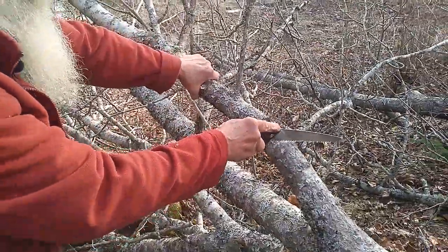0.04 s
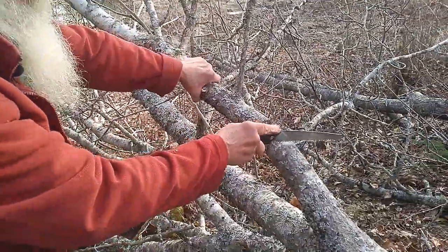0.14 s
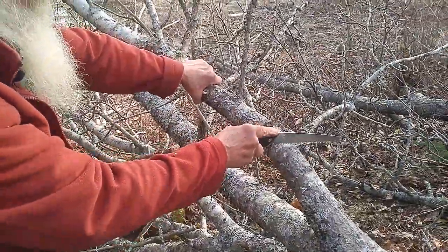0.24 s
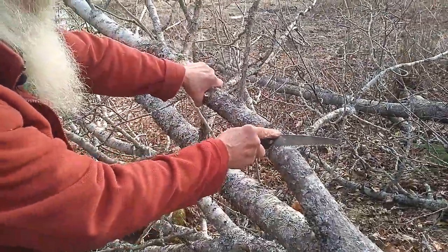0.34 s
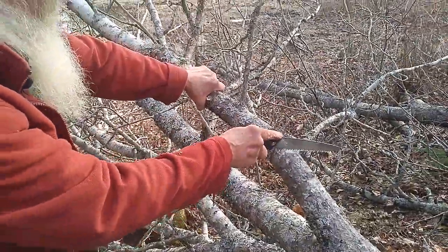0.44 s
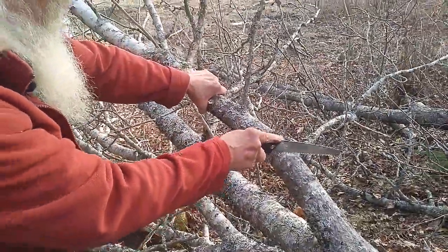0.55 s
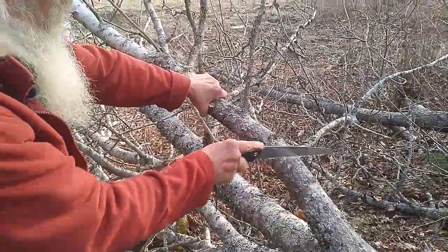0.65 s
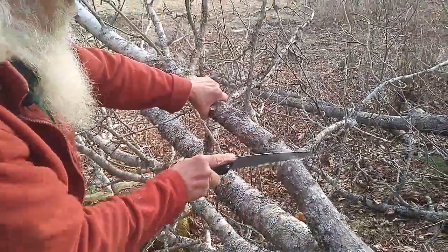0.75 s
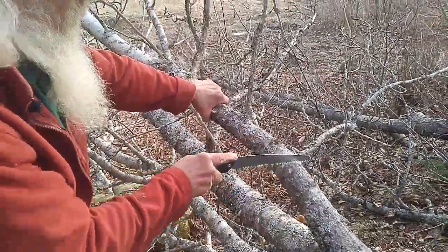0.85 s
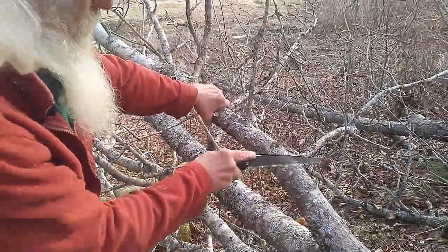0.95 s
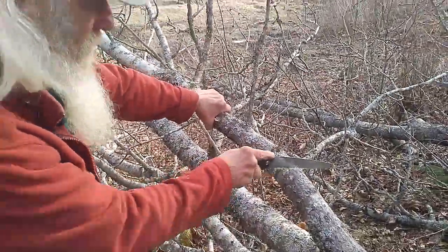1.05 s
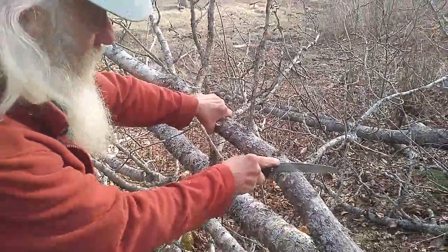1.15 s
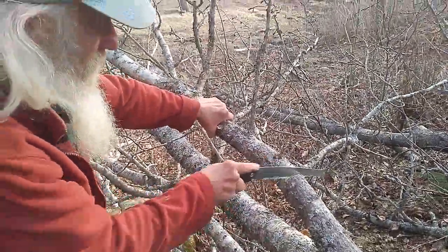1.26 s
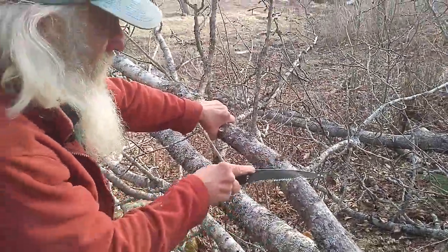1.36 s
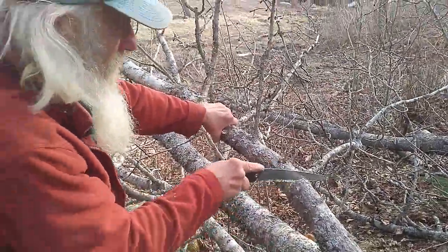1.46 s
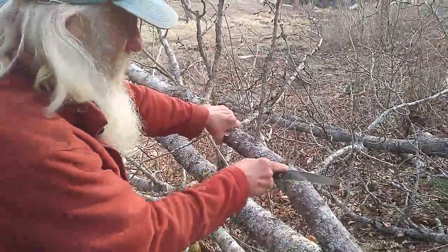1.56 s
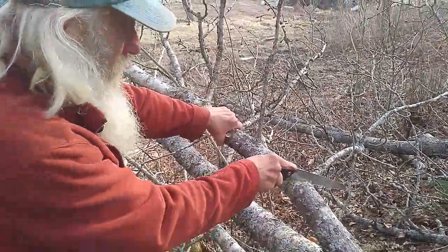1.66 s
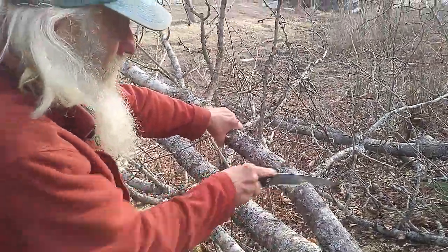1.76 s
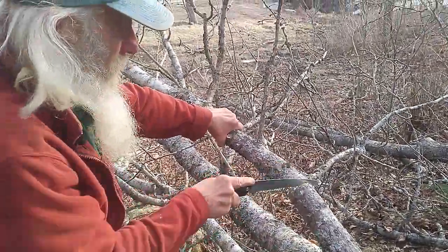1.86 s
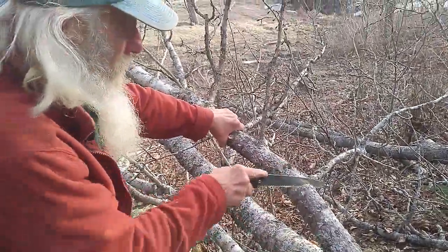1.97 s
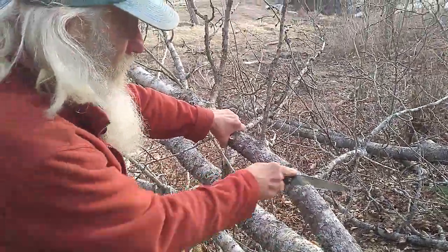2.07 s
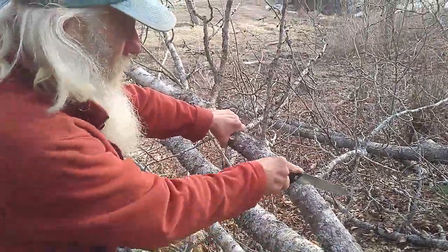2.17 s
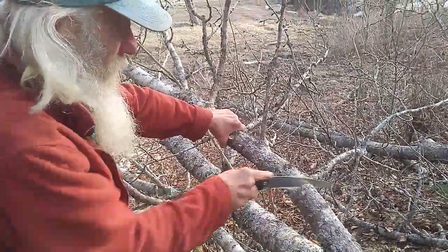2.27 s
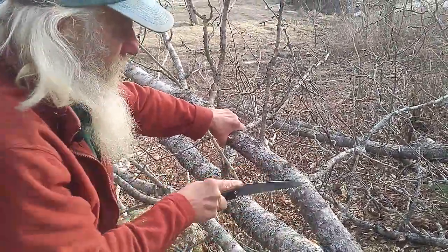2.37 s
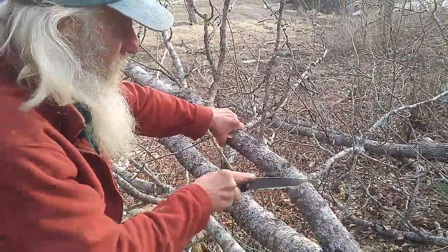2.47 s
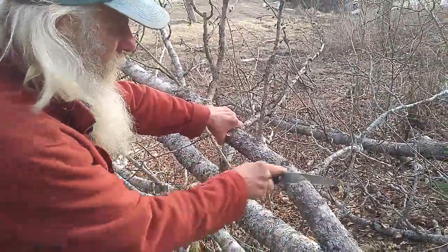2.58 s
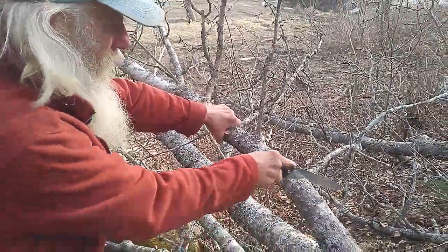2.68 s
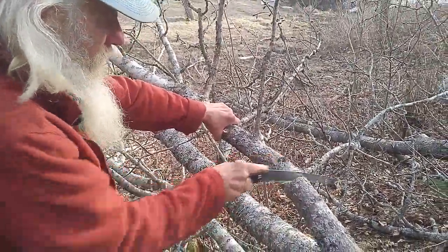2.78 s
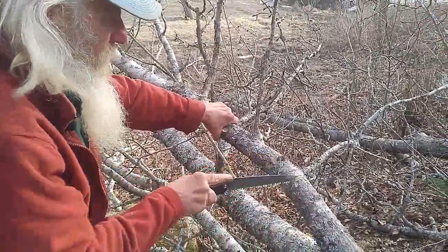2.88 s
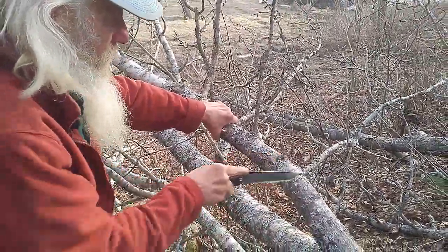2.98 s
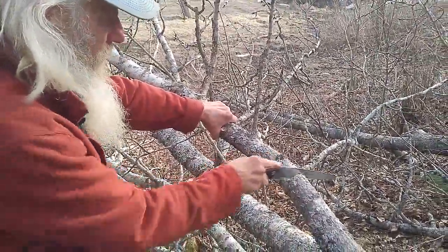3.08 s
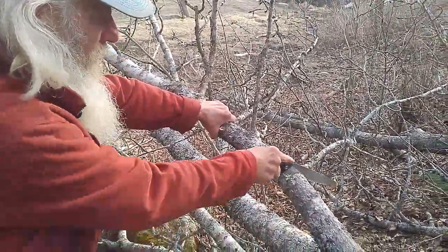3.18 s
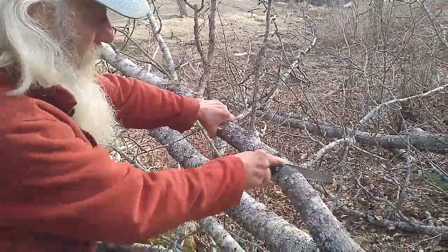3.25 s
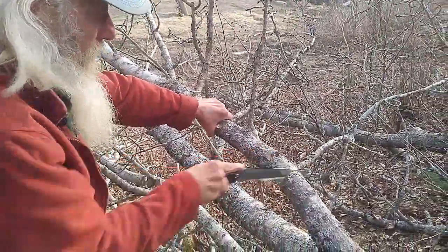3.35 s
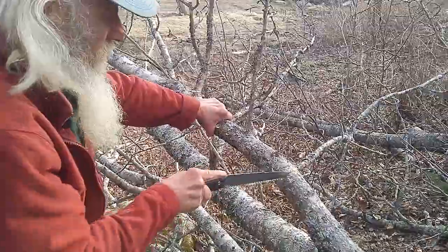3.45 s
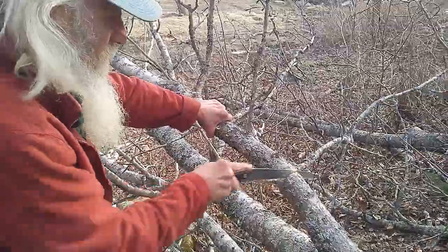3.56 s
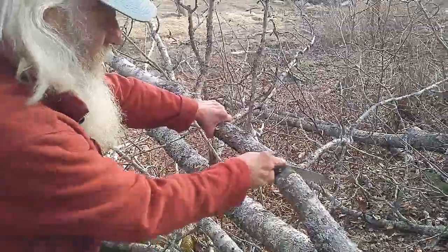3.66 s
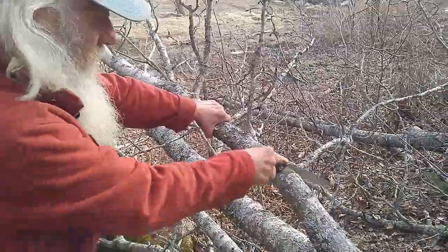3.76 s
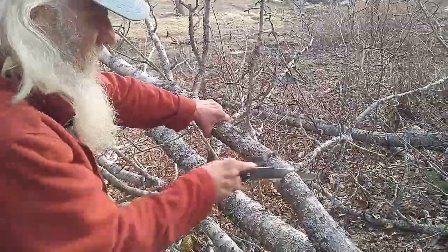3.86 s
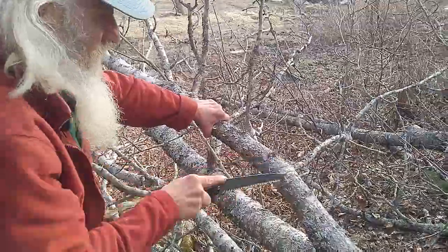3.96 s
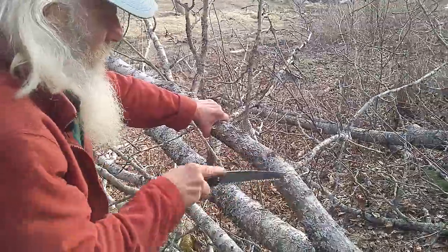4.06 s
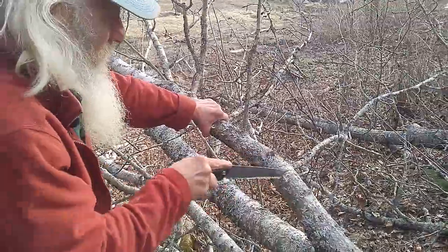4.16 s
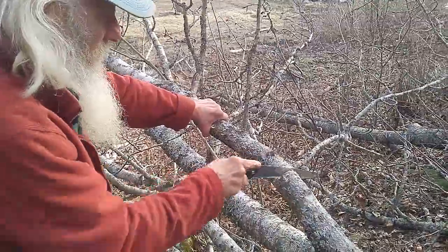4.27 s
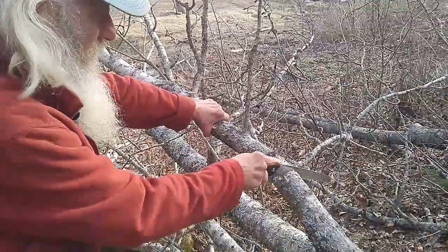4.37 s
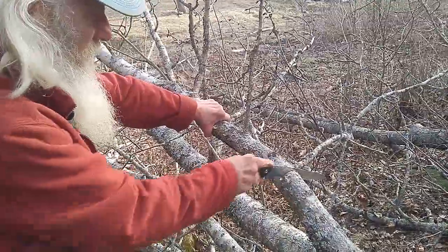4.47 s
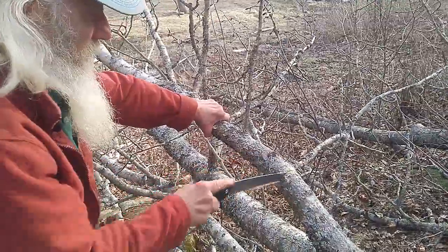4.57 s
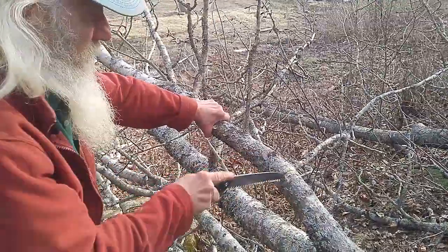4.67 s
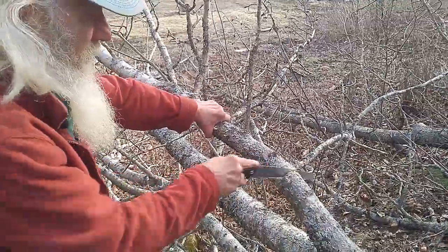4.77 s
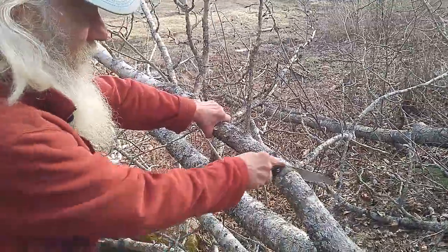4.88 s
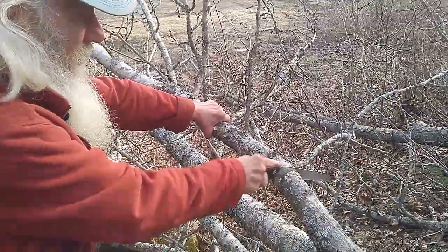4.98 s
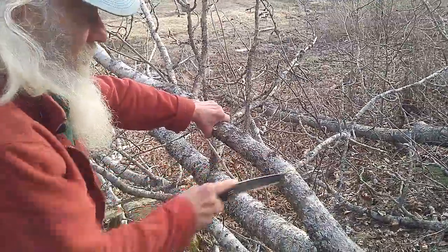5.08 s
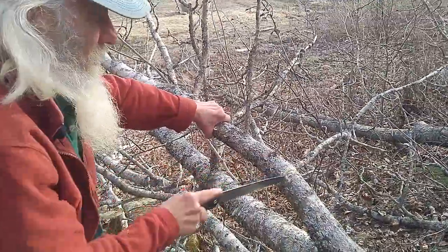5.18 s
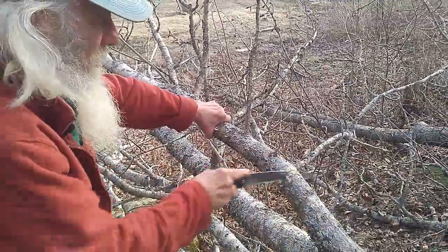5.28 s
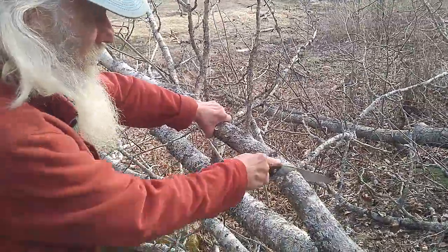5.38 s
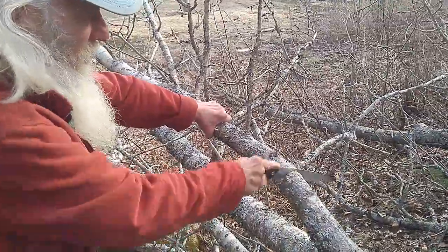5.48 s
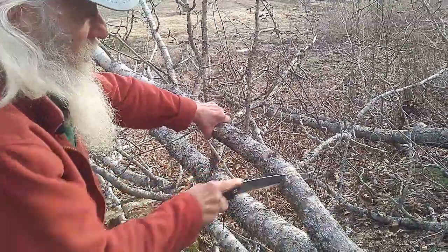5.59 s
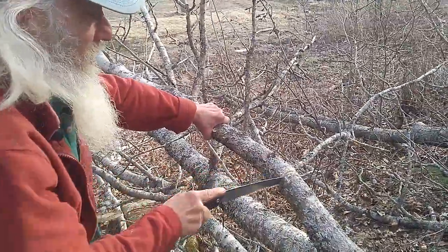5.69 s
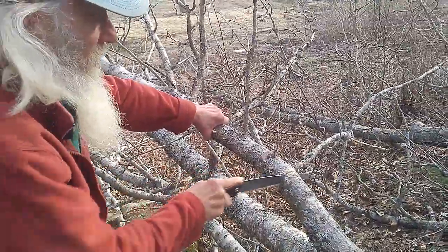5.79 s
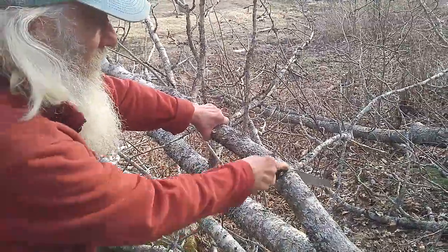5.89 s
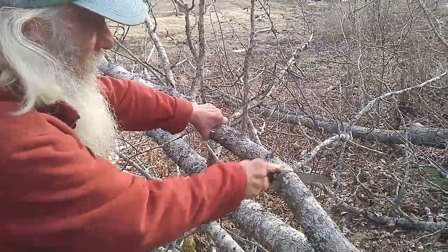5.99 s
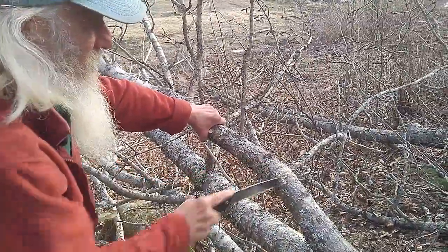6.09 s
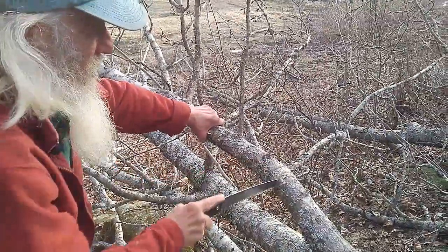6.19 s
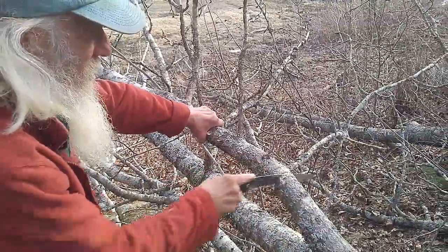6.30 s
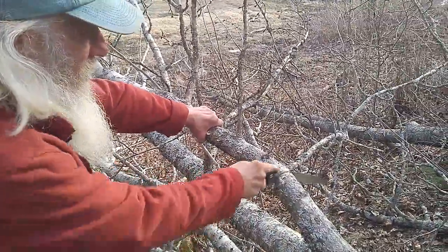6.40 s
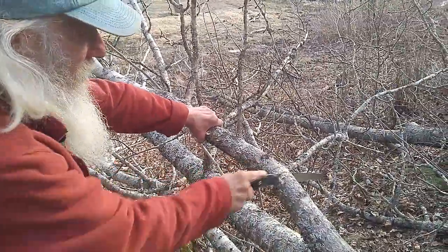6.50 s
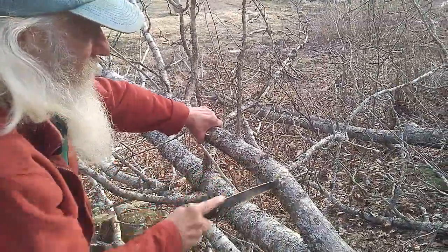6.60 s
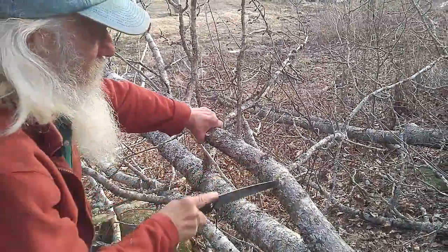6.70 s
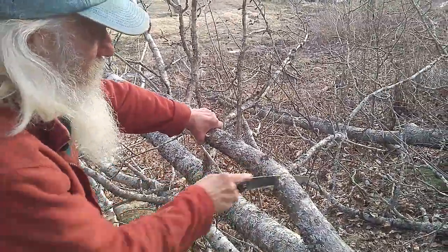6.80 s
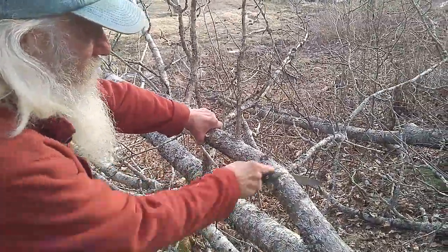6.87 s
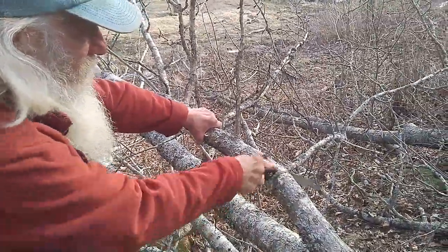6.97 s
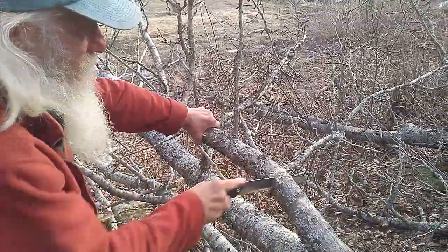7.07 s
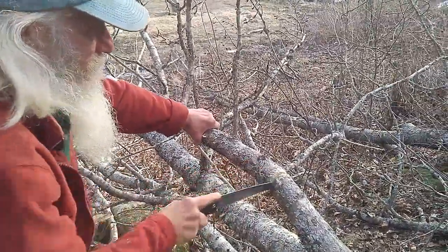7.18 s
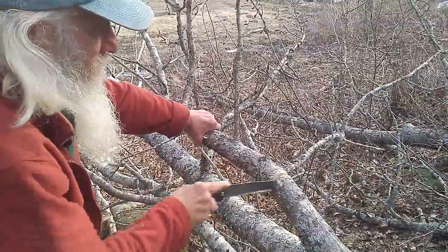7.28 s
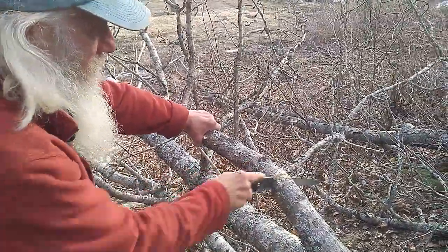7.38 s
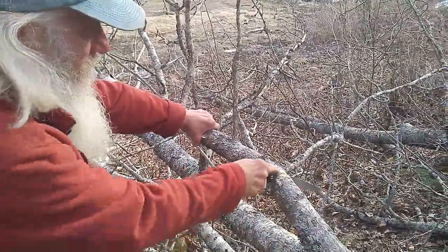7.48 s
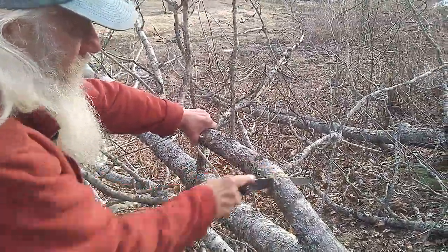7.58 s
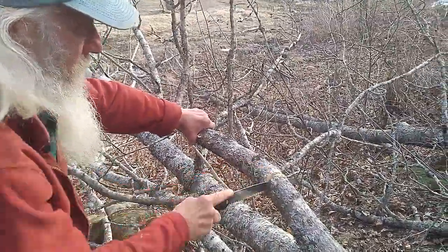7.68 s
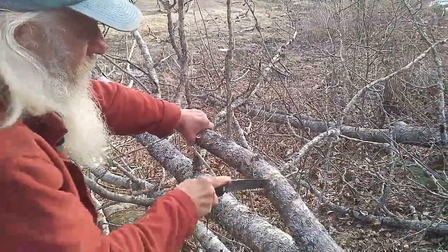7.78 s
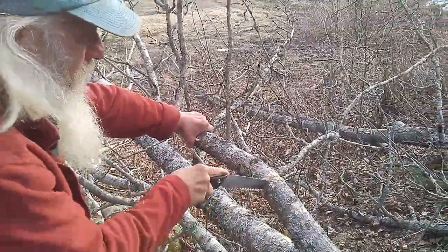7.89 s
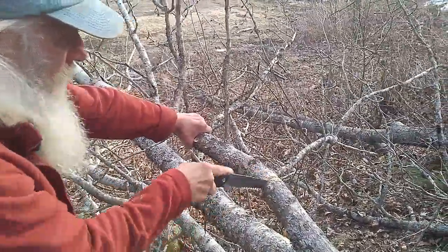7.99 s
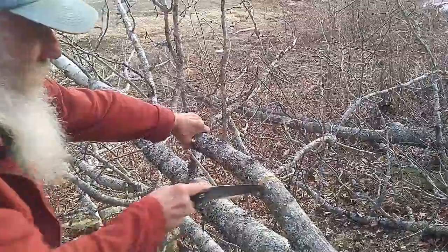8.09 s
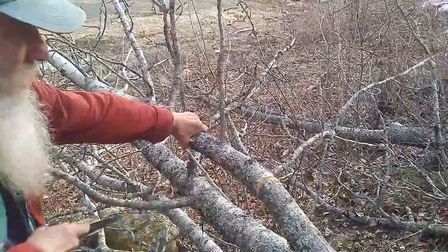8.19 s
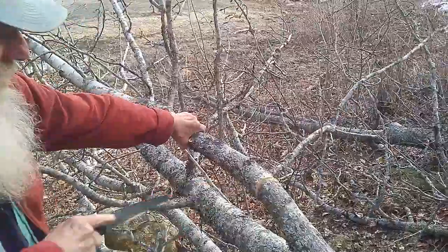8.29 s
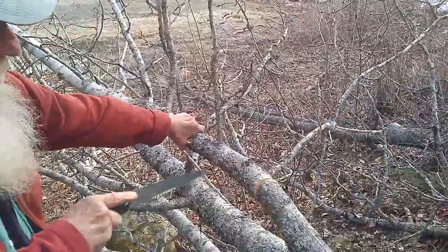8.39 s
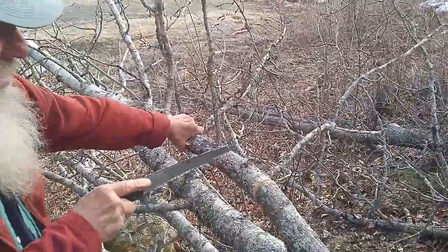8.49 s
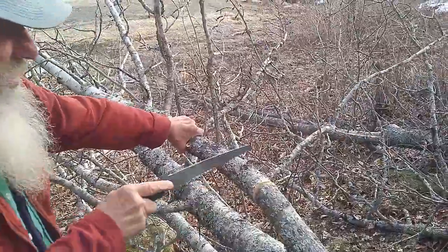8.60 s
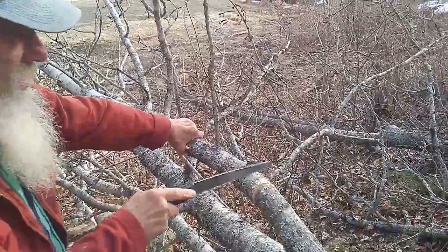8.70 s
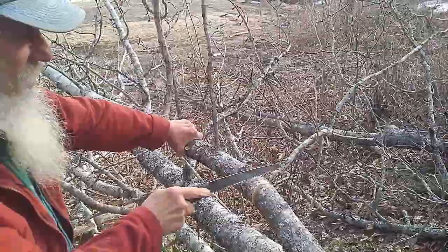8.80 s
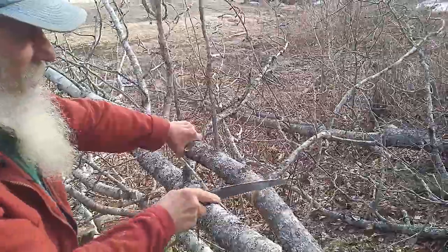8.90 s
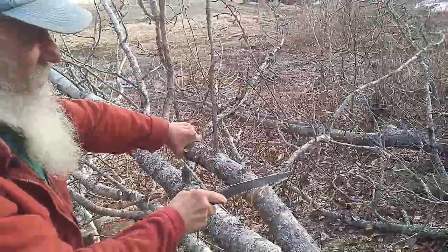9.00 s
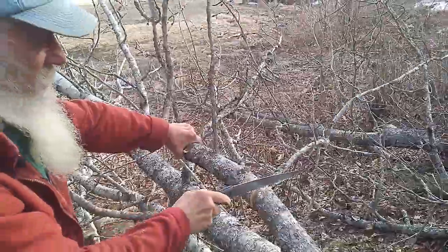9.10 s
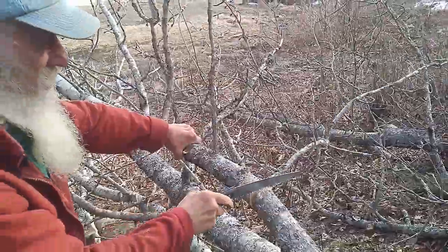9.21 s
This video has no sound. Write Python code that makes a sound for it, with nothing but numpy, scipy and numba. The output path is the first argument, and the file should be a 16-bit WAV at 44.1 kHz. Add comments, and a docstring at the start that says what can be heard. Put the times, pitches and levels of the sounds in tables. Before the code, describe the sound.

A quiet outdoor hush with faint dry rustling and tiny twig ticks opens the scene. At 0.7 s a hand saw starts on a branch, close and dry: a bright, gritty rasp with a buzzing knock of teeth. Loud pulls of about 0.2 s alternate with softer, duller pushes, nearly two pulls a second, growing stronger and more woody. Low shudders and jolts of the limb lie beneath. A sharp crack sounds at 4.0 s, a tiny thin bird chirp at 4.5, more snaps at 5.2 and 5.7, then clusters at 6.2-6.35, 6.7, 7.3 and, loudest, 7.8. The last push ends near 7.6; a short pull follows, and at 8.2 the blade scrapes out with heavy low thumps and a leafy swish. From 8.4 it calms: a brief brush and light cracks at 8.65, a very faint chirp near 8.95, small low knocks and ticks around 9.1.

```python
"""Leaves stir in a quiet wood; then a hand pruning saw works a branch in loud cutting pulls and lighter pushes,
until the blade is drawn out with a scrape. Teeth knock at a rate that follows stroke speed; torn grit throbs with
the teeth and rings blade and wood. Short noise bursts crack as fibres break and the branch snaps; filtered bass
noise shakes with load and jolts. Crackly grains rustle, tiny twigs tick, a small bird calls twice in gliding sines
over shaped-noise air."""
import sys
import numpy as np
from scipy import signal
from scipy.fft import rfft, irfft
from scipy.io import wavfile
from scipy.ndimage import uniform_filter1d
from numba import njit

SR = 44100
rng = np.random.default_rng(int(sys.argv[2]) if len(sys.argv) > 2 else 0)


def level_to_linear(level):
    """Convert decibel levels to linear amplitude factors, elementwise."""
    exponent = np.asarray(level, float) / 20
    return 10 ** exponent


def pcm_store(signal):
    """Save signal as 16-bit PCM."""
    levels = np.round(np.clip(np.atleast_2d(signal), -1, 1) * 32767)
    wavfile.write(sys.argv[1], SR, levels.astype(np.int16).T)


N = 407925
T = np.arange(N) / SR

# cutting pulls; the last row is the scrape of the blade drawn out:
# start t/s, end t/s, nominal top tooth rate f/Hz, nominal rasp level/dB, nominal knock level/dB
PULLS = [(.67, .9, 300.4, -44, -52), (1.267, 1.433, 245.4, -43.5, -53), (1.792, 1.966, 239.9, -42, -46.5),
         (2.275, 2.474, 279.5, -41, -45), (2.794, 2.993, 320.7, -41, -41.5),
         (3.312, 3.532, 300.6, -41, -45.5), (3.855, 4.077, 270, -40, -47.5),
         (4.538, 4.713, 323.4, -40, -53), (5.06, 5.246, 330.5, -39, -52.5),
         (5.575, 5.767, 265.4, -40.5, -49), (6.1, 6.286, 295.6, -39, -47), (6.597, 6.785, 247.5, -38, -55),
         (7.112, 7.325, 240.7, -37, -50), (7.653, 7.785, 284, -38.5, -57),
         (8.176, 8.258, 307, -37.5, -45.5)]
# light pushes back: start t/s, end t/s, nominal top tooth rate f/Hz, nominal rasp level/dB, nominal knock level/dB
PUSHES = [(.98, 1.23, 285, -54.5, -53.5), (1.525, 1.758, 255, -54, -68), (2.045, 2.22, 245, -49, -44.5),
          (2.54, 2.74, 250, -48, -50), (3.043, 3.255, 270, -49, -54.5), (3.59, 3.787, 310, -45.5, -52.5),
          (4.24, 4.48, 230, -48.5, -52.5), (4.807, 5.0, 285, -47, -57.5), (5.302, 5.529, 300, -45.5, -52.5),
          (5.833, 6.074, 310, -45.5, -51), (6.335, 6.537, 290, -45, -63), (6.86, 7.07, 148, -45, -42),
          (7.375, 7.591, 290, -46, -58)]
# shared by all strokes of a kind, by key: fastest (part of stroke), uneven (0-1), catch_s (teeth bite, t/s),
# rasp_db (early, late against middle in a shallow cut, level/dB), deep_db (added to these at depth 1, level/dB),
# grind_db (wood early, late, level/dB), dull_db (top end, level/dB), shake_db (bending of branch, level/dB),
# way (1 heel to tip, -1 back)
PULL_KIND = dict(fastest=.53, uneven=.23, catch_s=0.025, rasp_db=(-1, -1), deep_db=(-3, 2.5),
             grind_db=(-50.5, -46.5), dull_db=-1.4, shake_db=-54.5, way=1)
PUSH_KIND = dict(fastest=.42, uneven=0.0689, catch_s=0.016, rasp_db=(3.5, 0.5), deep_db=(-8.5, -7.5),
             grind_db=(-54, -51), dull_db=-5, shake_db=-75, way=-1)
# how tightly the cut grips the blade: t/s, grip (about 0-1)
DEPTH = [(.7, 0.25), (4.0, 1), (6.3, 1.01), (7.3, 0.5), (7.7, 0.4)]
# top end of the blade: t/s, relative level/dB
TOP_END = [(.7, -1), (2.7, -4), (4.0, -2.5), (4.8, -1), (6, 1), (7.2, -6.5), (7.7, -7), (8.2, -11)]
# partials of the tooth knock: multiple of tooth rate, relative level/dB
TOOTH_ORDERS = [(1, 0), (2, -8), (3, -15), (4, -18)]
# blade rings: nominal f/Hz, width f/Hz, relative level/dB, change from middle to tip level/dB (opposite to heel)
BLADE = [(1924, 130, -2.5, -4.5), (2200, 260, -7.5, -2), (3000, 680, -10.5, 2), (3410, 296, 0.5, 1),
         (4500, 1460, -6.5, -1.2), (5773, 310, 0, -2.2), (6400, 870, -4, -1.5), (7470, 1000, -7.5, -1.5),
         (9650, 3300, -6.5, -1), (11750, 2200, -1.5, 0.5), (14100, 2700, -11, 0)]
# wood resonances: nominal f/Hz, width f/Hz, relative level/dB
WOOD = [(163, 118, 1.5), (229, 180, 5.5), (365.6, 66, 1), (428, 25, -3.5), (633, 127, 2.5), (850, 82, 3.5),
        (1070, 1750, -8)]
# fibres and twigs cracking: t/s, snap peak level/dB, added ring f/Hz, low knock against snap peak level/dB
CRACKS = [(4.023, -9, 3420, -19), (4.1927, -37, 2870, -16), (4.2051, -35.5, 6490, -30),
          (5.229, -14, 3300, -25.5), (5.523, -36, 2900, -17), (5.731, -24, 3095, -21),
          (6.2147, -9, 3220, -26), (6.2448, -8.5, 4500, -25.5), (6.2708, -25, 4600, -16),
          (6.304, -40, 7000, -25), (6.312, -9.5, 1240, -27), (6.3564, -34, 4770, -11),
          (6.7179, -13.5, 5000, -28), (6.734, -14, 5140, -35), (6.741, -16.5, 3060, -23),
          (6.754, -17, 4840, -25), (6.7873, -14.5, 1060, -28), (7.258, -7.5, 3040, -20),
          (7.2707, -18, 5200, -18), (7.2752, -15.5, 5600, -16), (7.2941, -17.5, 5200, -31),
          (7.3162, -15, 3200, -18.5), (7.764, -10.5, 3000, -17), (7.7701, -16, 5000, -19),
          (7.7754, -3, 5600, -23), (7.7793, -3, 5150, -13), (7.809, -30, 2000, -7), (7.858, -40, 5000, -13),
          (8.1284, -19, 850, -12.5), (8.1671, -17, 5200, -18), (8.24, -17.5, 970, -13.5),
          (8.6465, -37, 2480, -7), (8.6536, -28.5, 3760, -10), (8.7523, -45.5, 756, -2.5),
          (8.7795, -40.5, 1010, -8), (9.035, -51, 600, 14.5), (9.078, -39, 7400, -11.5),
          (9.1633, -48, 1480, -24), (9.191, -40, 7900, -27)]
# resonances rung by a crack: nominal f/Hz, width f/Hz, relative level/dB
CRACK_BODY = [(1154, 243, 7), (1876, 240, 7.5), (3080, 2300, -2), (6420, 4100, -8.5), (7200, 254, -10),
              (10800, 6500, -0.5), (12450, 1200, -15)]
# branch swaying between strokes: t/s, level/dB
SWAY = [(0, -62), (.08, -74), (.5, -66), (1.1, -56.5), (2.5, -54), (4.2, -57), (5.4, -51), (7.6, -53),
        (7.95, -66.5), (8.1, -51.5), (8.5, -74), (9.25, -72.5)]
# jolts of the limb, as teeth snag and as it sags, drops and settles: t/s, level/dB
LURCHES = [(.79, -45), (1.18, -52), (1.83, -41), (1.93, -44), (3.4, -51), (3.53, -47), (3.94, -45),
           (4.66, -37.5), (5.199, -40), (6.21, -52), (7.19, -57), (7.69, -40), (7.83, -46), (8.2, -42),
           (8.26, -35), (8.305, -32), (8.35, -41), (8.399, -37.5), (8.68, -52.5), (9.06, -53)]
# twigs and leaves before settling: t/s, level/dB
STIR = [(0, -59), (.07, -61), (.3, -78), (.5, -69), (.63, -58.5), (1.3, -62), (3.8, -57), (4.5, -61),
        (6.1, -59), (7.1, -60), (7.7, -56), (7.95, -63), (8.1, -66), (8.27, -49.5), (8.45, -67.5),
        (8.6, -74), (8.9, -67), (9.25, -66.5)]
# leaves swept: start t/s, nominal level/dB, rise t/s, decay constant t/s
BRUSHES = [(.88, -54, .03, 0.055), (6.79, -52, 0.017, .05), (7.79, -49.5, 0.019, 0.022),
           (8.29, -51.5, 0.052, 0.019), (8.649, -41, 0.0085, 0.013), (8.69, -62, 0.016, 0.034),
           (9.07, -60.5, 0.038, 0.021), (9.21, -69, 0.027, .04)]
# rustle spectrum: f/Hz, relative level per Hz/dB
RUSTLE_COLOUR = [(410, -32), (700, -0.5), (984, 0.5), (1840, -4), (2560, -3), (3160, -5), (5330, -5.5),
                 (16000, -14)]
# two calls, a list each: t/s, f/Hz, nominal rms level/dB
BIRD_CALLS = [
    [(4.478, 6810, -68), (4.498, 7230, -52), (4.526, 7770, -56), (4.537, 7690, -68)],
    [(8.948, 6901, -81), (8.956, 7138, -60), (8.98, 8000, -66), (9.002, 7833, -68), (9.03, 7918, -76)],
]
# spectrum of the distant hush: f/Hz, relative level per Hz/dB
AIR_COLOUR = [(18, -18.5), (30, -6.5), (70, -4.5), (210, -6.5), (336, -3.5), (473, -7.5), (780, -12),
              (962, -23), (6900, -29), (14000, -36), (16000, -39.5)]

GRIND_DB_PER_RASP_DB, USUAL_RASP_DB = 0.5, {1: -42.5, -1: -45}  # harder strokes grind more; keyed by way
SAG_PER_S = 0.012  # fraction by which blade rings sink as more steel is buried in the cut
DULL_FROM_DB, DULL_DB_PER_DB = -15.5, 4  # knocks with more low end than this lose treble
LURCH_HALF_WIDTH_S = 0.019  # to 1/e
SETTLE_DB, SETTLE_S, LOOSE_S = -7.5, .16, (3.9, 7.1)  # the loosening limb ends settling over LOOSE_S
TICKS_PER_S, TICK_MAX_DB = 18, -46  # gain of the largest tick
AIR_DB = -62.5
TOP_HZ = 15700


def unit(x):
    """Scale to rms 1."""
    return x / np.sqrt(np.mean(x ** 2))


def curve(rows, column):
    """One dB column over time as gain, -140 dB outside the table."""
    rows = np.array(rows)
    return level_to_linear(np.interp(T, rows[:, 0], rows[:, column], left=-140, right=-140))


@njit
def svf(x, hz, width):
    """State-variable band-pass with a moving centre, gain 1 at the centre."""
    y, b, l = np.empty(len(x)), 0., 0.
    for i in range(len(x)):
        g, k = np.tan(np.pi * hz[i] / SR), width / hz[i]
        v = (b + g * (x[i] - l)) / (1 + g * (g + k))
        b, l, y[i] = 2 * v - b, l + 2 * g * v, k * v
    return y


def ring(x, modes, drift=0.932, sway_db=None):
    """Sum of resonances, neighbours in opposite phase; drift scales f, sway_db(mode) moves each level."""
    total = 0
    for k, mode in enumerate(modes):
        level_db = mode[2] + (sway_db(mode) if sway_db else 0)
        centre_hz = mode[0] * drift * np.ones(len(x))
        total = total + (-1) ** k * level_to_linear(level_db) * svf(x, centre_hz, 1. * mode[1])
    return total


def walk(rate_hz):
    """Random levels held 1 / rate_hz s, smoothed twice, rms 1."""
    hold = int(SR / rate_hz)
    steps = np.repeat(rng.standard_normal(N // hold + 1), hold)
    return unit(uniform_filter1d(uniform_filter1d(steps, hold), hold)[:N])


def coloured(x, points):
    """Shape x by a spectrum of (Hz, dB) points, then scale to rms 1."""
    hz, db = np.transpose(points)
    f_hz = np.fft.rfftfreq(N, 1 / SR) + 1
    return unit(irfft(rfft(x) * level_to_linear(np.interp(np.log(f_hz), np.log(hz), db)), N))


def gritty(spread_db):
    """Dense grains whose sizes have a long tail."""
    return rng.standard_normal(N) * level_to_linear(spread_db * rng.exponential(size=N))


def strokes():
    """Every stroke with the rules of its kind."""
    return [(row, PULL_KIND) for row in PULLS] + [(row, PUSH_KIND) for row in PUSHES]


def teeth():
    """Tooth phase, knock gain and branch load: speed rises and falls in each stroke; cutting makes it uneven."""
    hz, gain, rough, load = np.full(N, 100.), np.zeros(N), np.zeros(N), np.zeros(N)
    for (start, end, top_hz, _, knock_db), kind in strokes():
        at = slice(int(start * SR), int(end * SR))
        fastest_s = start + kind["fastest"] * (end - start)
        swing = np.sin(np.interp(T[at], [start, fastest_s, end], [0, np.pi / 2, np.pi]))
        hz[at] = top_hz * (.45 + .55 * swing)
        gain[at] = level_to_linear(knock_db) * swing ** 1.07
        rough[at] = kind["uneven"]
        load[at] = level_to_linear(kind["shake_db"]) * swing
    uneven_hz = hz * (1 + rough * np.clip(walk(90), -2, 2) / 2)
    phase = 2 * np.pi * np.cumsum(uneven_hz) / SR
    return phase, gain * level_to_linear(6.4 * rough * walk(60)), load


def bite():
    """Rasp gain, grind gain, brightness dB, progress -1..1 and place on the blade -1..1 through each stroke."""
    rasp, grind, bright_db, along, place = np.zeros((5, N))
    for (start, end, _, db, _), kind in strokes():
        at = slice(int((start - .03) * SR), int((end + .03) * SR))
        part = (T[at] - start) / (end - start)
        ramp_s = 0.21 * (end - start)
        edge_s = [start - kind["catch_s"], start, start + ramp_s, end - ramp_s, end, end + 0.011]
        edge_db = np.interp(T[at], edge_s, [-59, -6.5, 2.5, 2, -10.5, -47.0])
        depth = np.interp(start, *np.transpose(DEPTH))
        early_db, late_db = np.add(kind["rasp_db"], depth * np.array(kind["deep_db"]))
        rasp[at] += level_to_linear(edge_db + db + np.interp(part, [.2, .5, .8], [early_db, 0, late_db]))
        effort_db = GRIND_DB_PER_RASP_DB * (db - USUAL_RASP_DB[kind["way"]])
        grind[at] += level_to_linear(edge_db + np.interp(part, [.25, .75], kind["grind_db"]) + effort_db)
        bright_db[at] = kind["dull_db"] + np.interp(start, *np.transpose(TOP_END))
        along[at] = np.clip(2 * part - 1, -1, 1)
        place[at] = kind["way"] * along[at]
    return rasp, grind, bright_db, along, place


def saw(phase, knock_gain):
    """Tooth knocks, plus tearing grit that throbs once a tooth and rings blade and wood."""
    rasp_gain, grind_gain, bright_db, along, place = bite()

    # no two teeth are set alike, so each partial flickers
    knock = unit(sum(level_to_linear(db + (2 + k) * walk(30)) * np.sin(k * phase) for k, db in TOOTH_ORDERS))
    knock = knock_gain * level_to_linear(5.6 * along) * knock  # grows as the stroke leans in
    knock = knock + level_to_linear(-15.0) * svf(knock, np.full(N, 225.), 89.5)  # branch resonance

    throb = (1 + 0.15 * np.cos(phase)) * level_to_linear(1.2 * walk(40))
    # independent grit noises for alternate blade rings, and a broadband one
    even_grit, odd_grit, broad_grit = (unit(gritty(1.3) * throb) for _ in range(3))

    # free length of blade changes along the stroke: rings wander and trade strength
    drift = 1 - SAG_PER_S * T + .01 * walk(5)

    def sway_db(mode):
        """Level of one blade ring by place, at random, and by brightness above 8 kHz."""
        return mode[3] * place + 2.3 * walk(14) + bright_db * (mode[0] > 8000)

    rasp = ring(even_grit, BLADE[::2], drift, sway_db) + ring(odd_grit, BLADE[1::2], drift, sway_db)
    broad_grit = signal.sosfilt(signal.butter(2, 1300, "high", fs=SR, output="sos"), broad_grit)
    rasp = unit(rasp + level_to_linear(-10.5 + 0.43 * bright_db) * broad_grit)
    grind = unit(ring(gritty(2.8) * throb, WOOD, 1 + 0.037 * walk(6.9)))
    return knock + rasp_gain * rasp + grind_gain * grind


def cracks():
    """A burst of breaking fibres builds fast and dies; it rings the wood, differently each time."""
    length = 4096
    out, t = np.zeros(N + length), np.arange(length) / SR
    bursts = rng.standard_normal((len(CRACKS), length))
    for (s, peak_db, ring_hz, low_db), noise in zip(CRACKS, bursts):
        decay = np.exp(-t / 0.0016) + level_to_linear(-14) * np.exp(-t / 0.0028)
        burst = noise * (1 - np.exp(-t / 0.00019)) * decay
        split = level_to_linear(3.0) * burst * np.exp(-t / 0.0014)  # heard directly, full band and shortest
        dull_db = DULL_DB_PER_DB * max(low_db - DULL_FROM_DB, 0)
        crisp = level_to_linear(-dull_db) * (ring(burst, CRACK_BODY) + split)
        snap = crisp + level_to_linear(-1.5) * svf(burst, np.full(length, 1. * ring_hz), 200 + ring_hz / 6)
        low = ring(noise * np.exp(-t / 0.0072), WOOD[1:])  # the limb takes a longer push
        low = svf(low, np.full(length, 480.), 1100.)
        sound = snap / np.abs(snap).max() + level_to_linear(low_db) * low / np.abs(low).max()
        at = int(s * SR)
        out[at:at + length] += level_to_linear(peak_db) * sound
    return out[:N]


def shake(load):
    """The branch shudders in a broad low resonance, swaying, under stroke load and at every jolt."""
    low = rng.standard_normal(N) * level_to_linear(2.65 * walk(25))
    for hz, width_hz in ((57., 29.0), (60., 118.0), (62., 175.0)):
        low = svf(low, np.full(N, hz), width_hz)
    lurch = sum(level_to_linear(db) * np.exp(-((T - s) / LURCH_HALF_WIDTH_S) ** 2) for s, db in LURCHES)
    return (curve(SWAY, 1) + uniform_filter1d(load, 1500) + lurch) * unit(low)


def rustle():
    """Dry twigs and leaves stir in crackly grains; they fall quiet when a pull lets go, then stir again."""
    ends = np.transpose(PULLS)[1]
    since_s = T - np.append(-9, ends)[np.searchsorted(ends, T)]
    settle_db = SETTLE_DB * np.interp(T, LOOSE_S, [1, 0]) * np.clip(1 - since_s / SETTLE_S, 0, 1)
    gain = curve(STIR, 1) * level_to_linear(settle_db)
    for s, db, rise_s, fall_s in BRUSHES:
        rise = np.clip((T - s) / rise_s, 0, 1) ** 2
        fall = np.exp(-np.maximum(T - s - rise_s, 0) / fall_s)
        gain = gain + level_to_linear(db) * rise * fall
    return gain * coloured(gritty(1.7) * level_to_linear(2.5 * walk(70)), RUSTLE_COLOUR)


def ticks():
    """Tiny twig snaps, decaying in a millisecond, at random times, each with its own size and colour."""
    length = 256
    out, t = np.zeros(N + length), np.arange(length) / SR
    for when, size, tone, *noise in rng.random((int(TICKS_PER_S * N / SR), 3 + length)):
        burst = (2 * np.array(noise) - 1) * np.exp(-t / .001)
        at = int(when * N)
        centre_hz = np.full(length, 2000 * 5 ** tone)
        out[at:at + length] += level_to_linear(TICK_MAX_DB - 12 * size) * svf(burst, centre_hz, 5000.)
    return out[:N]


def bird():
    """Thin whistles: sines that glide in pitch, chiefly upward, with a slight flutter in level."""
    out = 0
    for call in BIRD_CALLS:
        s, hz, _ = np.transpose(call)
        phase = 2 * np.pi * np.cumsum(np.interp(T, s, hz)) / SR
        out = out + np.sqrt(2) * curve(call, 2) * level_to_linear(2.5 * walk(150)) * np.sin(phase)
    return out


def air():
    """Distant hush: shaped noise, wavering a little."""
    return level_to_linear(AIR_DB) * coloured(rng.standard_normal(N), AIR_COLOUR) * level_to_linear(1.2 * walk(1.1))


def scene():
    """Near sounds come again off the ground and faintly off nearby trunks; both channels are alike."""
    phase, knock_gain, load = teeth()
    near = saw(phase, knock_gain) + cracks() + rustle() + ticks() + bird()
    t = np.arange(8192) / SR
    echo = level_to_linear(-34.5) * rng.standard_normal(8192) * np.exp(-t / 0.0097)  # trunks
    echo[0] = 1  # direct
    echo[int(.0125 * SR)] += level_to_linear(-29)  # single delayed return
    mono = signal.fftconvolve(near, echo)[:N] + shake(load) + air()
    return np.array([mono, mono])


def top_cut(x):
    """Nothing passes above the cut-off."""
    return signal.sosfilt(signal.butter(12, 17000, fs=SR, output="sos"), x)


def record(dry):
    """A high-pass removes deep bass; a steep low-pass limits the band at TOP_HZ."""
    no_rumble = signal.sosfilt(signal.butter(2, 38, "high", fs=SR, output="sos"), dry)
    mix = signal.sosfilt(signal.ellip(12, .2, 70, TOP_HZ, fs=SR, output="sos"), no_rumble)
    return top_cut(mix)


dry = scene()
out = record(dry)
pcm_store(out)
```